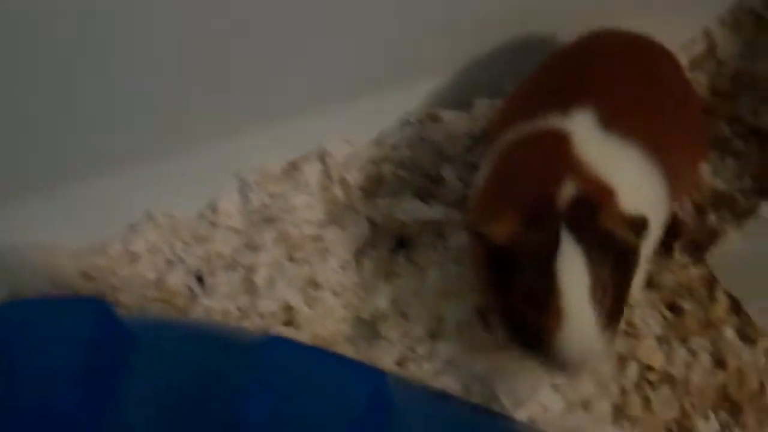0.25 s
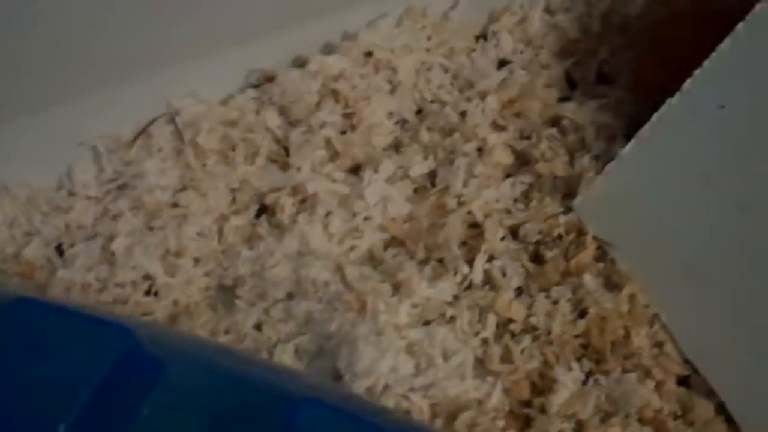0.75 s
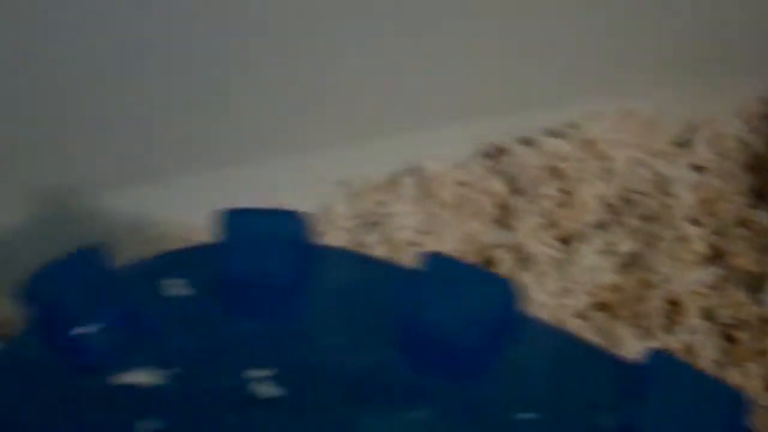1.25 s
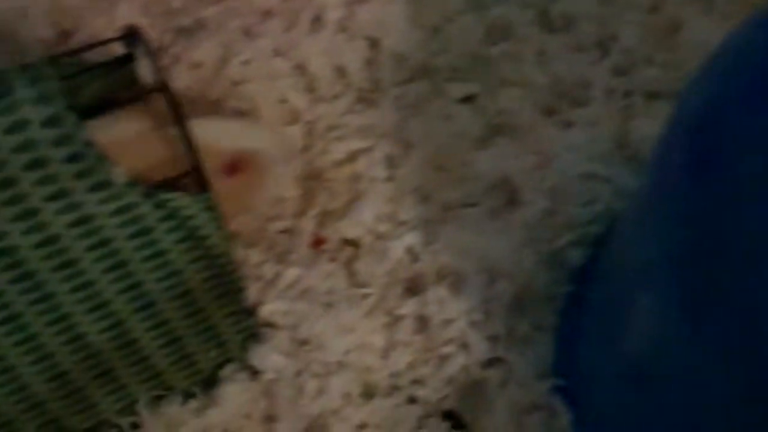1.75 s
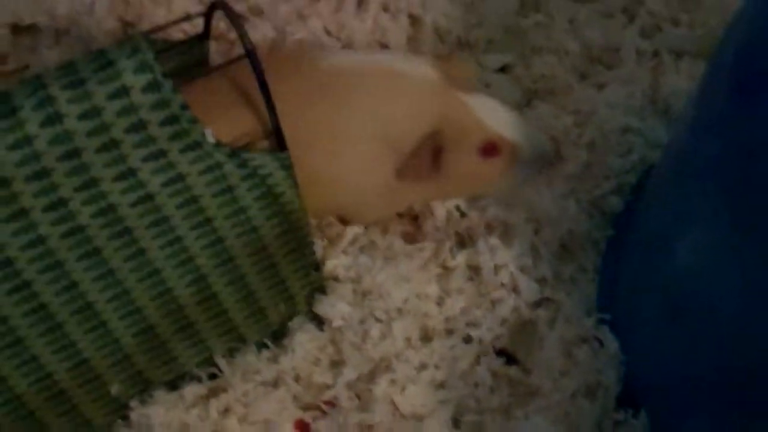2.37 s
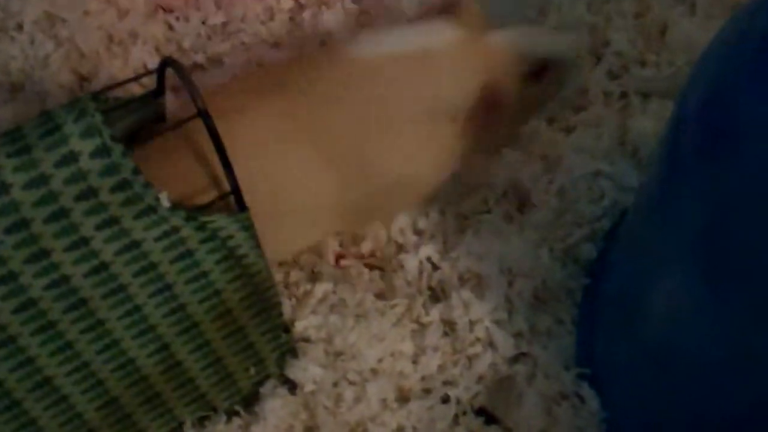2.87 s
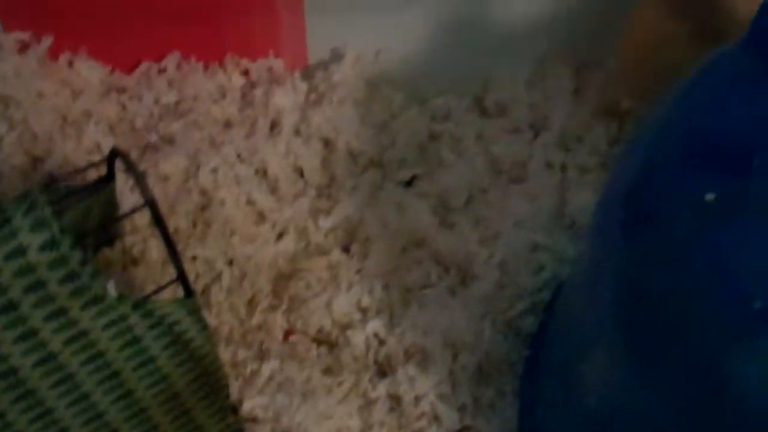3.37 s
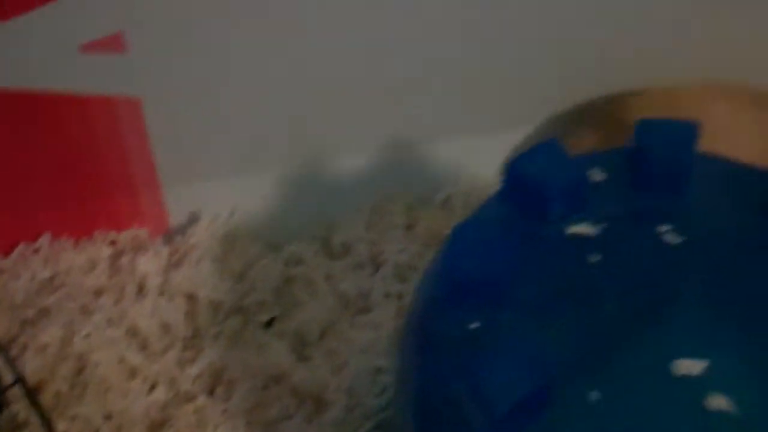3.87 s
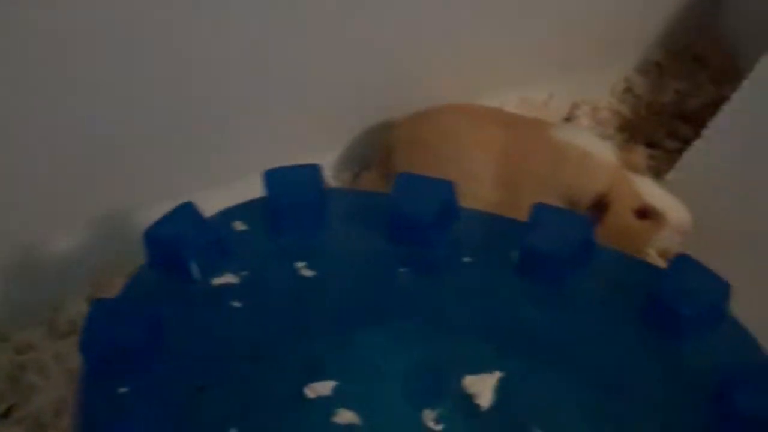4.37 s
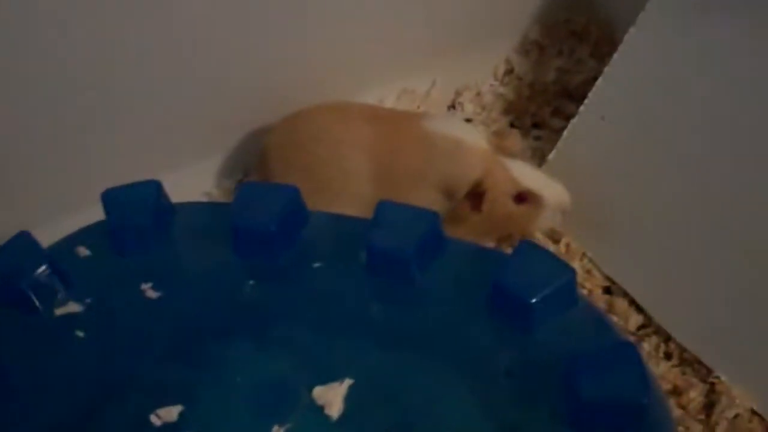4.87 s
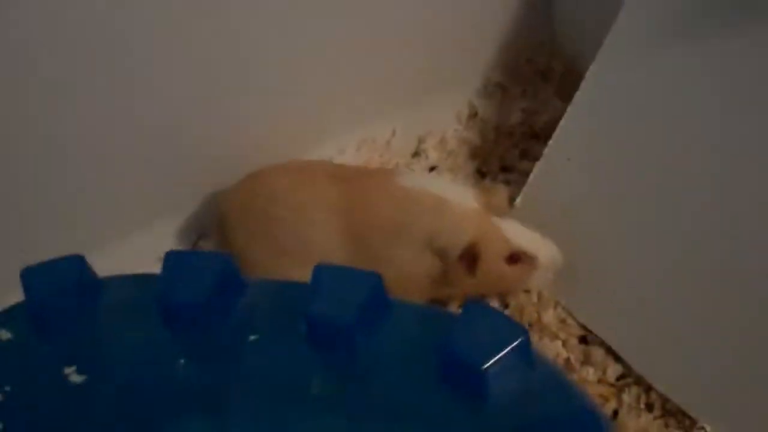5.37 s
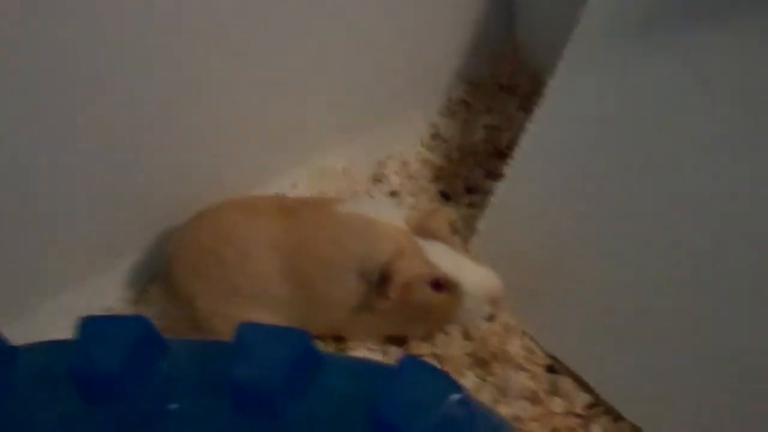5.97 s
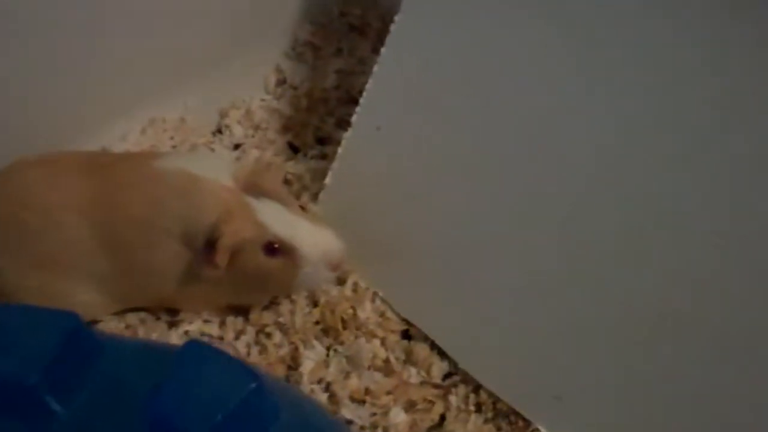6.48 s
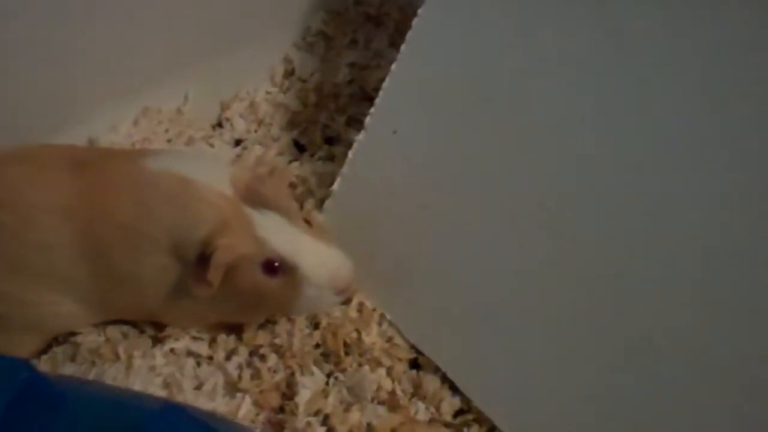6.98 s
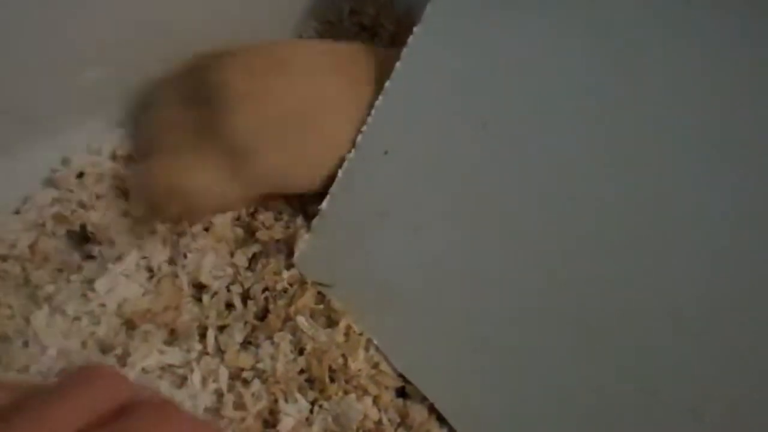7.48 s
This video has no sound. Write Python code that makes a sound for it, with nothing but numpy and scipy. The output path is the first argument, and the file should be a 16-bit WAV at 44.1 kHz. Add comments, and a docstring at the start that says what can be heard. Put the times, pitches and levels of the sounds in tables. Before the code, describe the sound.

Guinea pigs beg in a shavings-filled pen: three piercing rising wheeks early on, with constant low squeaks, hoarse chutters, rustling bedding and small knocks.

```python
"""Guinea pigs begging for food

Two guinea pigs call in a pen bedded with wood shavings, heard from close by. Three piercing wheeks sweep up
and break higher; low scooping squeaks, hoarse chutters and thin peeps go on around them. The calls are
harmonic voices, the scuffs grainy noise, the knocks short noise rings. Pen walls and a small room answer,
over hiss, a wavering hum, a thin whine and a faint low tone that swells twice."""
import sys
import numpy as np
from scipy import signal
from scipy.fft import rfft, irfft, next_fast_len
from scipy.io import wavfile
from scipy.ndimage import map_coordinates

SR = 44100
rng = np.random.default_rng(int(sys.argv[2]) if len(sys.argv) > 2 else 0)


def inscribe(sig):
    """Save sig as 16-bit PCM at rate SR to the path in sys.argv[1].

    A 1-D sig is mono; a 2-D sig holds one channel per row.
    Samples are clipped to [-1, 1] before scaling.
    """
    pcm = np.round(np.clip(np.atleast_2d(sig).T, -1, 1) * 32767)
    wavfile.write(sys.argv[1], SR, pcm.astype(np.int16))


N = 340893

# The wheeks. Each row: swell-in in seconds, length after the voice breaks in seconds, pitch aimed at by
# the end in Hz, level in dB before the mouth resonance, strain from 0 to 1.
WHEEKS = [(0.085, 0.113, 4007, -25, 0.02), (0.16, 0.078, 4050, -26.5, 0.18),
          (0.1, 0.044, 4460, -26.5, 0.46)]
# Pitch path of each wheek up to its break, one list a wheek. Each row: time in seconds, pitch in Hz.
WHEEK_GLIDES = [
    [(1.222, 3700), (1.26, 3030), (1.3, 2690), (1.365, 2696), (1.395, 2913), (1.609, 3174)],
    [(1.96, 1020), (2.05, 1812), (2.145, 1993), (2.23, 2460), (2.31, 2857), (2.402, 3071)],
    [(2.71, 1114), (2.75, 1618), (2.79, 1966), (2.82, 2084), (2.85, 2548), (2.976, 2985)],
]
# Squeaks that dip and rise. Each row: start in seconds, time from there to the dip in seconds, length in
# seconds, pitch of the dip in Hz, fundamental at the dip in dB, overtones in dB.
SQUEAKS = [(0.085, 0.058, 0.11, 514.5, -41, -43), (0.343, 0.052, 0.13, 365, -41.5, -40),
           (0.651, 0.0, 0.078, 851, -47.5, -50), (0.867, 0.031, 0.13, 579.4, -36.5, -43),
           (1.27, 0.074, 0.15, 514, -43, -55), (1.843, 0.0024, 0.12, 576.7, -29.5, -39.5),
           (2.557, 0.0038, 0.17, 633.6, -40.5, -42), (2.77, 0.045, 0.1, 630, -41, -40.0),
           (3.119, 0.028, 0.19, 586.3, -34.5, -44), (3.549, 0.031, 0.13, 549, -33, -47),
           (3.999, 0.05, 0.15, 535, -34, -45.5), (4.388, 0.049, 0.1, 517.5, -33.5, -43),
           (4.669, 0.059, 0.11, 525.6, -41, -50.5), (4.971, 0.051, 0.11, 509, -38.5, -48.0),
           (5.324, 0.03, 0.141, 562, -36.5, -46.5), (5.573, 0.062, 0.15, 587, -39.5, -49),
           (5.848, 0.05, 0.1, 482, -39.5, -50), (6.275, 0.015, 0.094, 557, -43.5, -52),
           (6.494, 0.05, 0.1, 525.4, -41, -47.5), (6.794, 0.0, 0.16, 576, -45.5, -52),
           (7.633, 0.038, 0.082, 532, -35.5, -51)]
# Faint climbs to a thin peep. Each row: time of the top in seconds, length of the climb in seconds, level in dB.
PEEPS = [(3.442, 0.11, -47), (3.891, 0.28, -46), (4.255, 0.1, -39), (4.53, 0.046, -43), (7.032, .1, -54.5)]
# Hoarse chutters, and one faint squeak at 2.358 s rendered hoarsely. Each row: centre in seconds, level in dB.
CHUTTERS = [(0.129, -44), (0.606, -41.5), (2.358, -47), (3.32, -41), (3.536, -42.5), (3.772, -42.5),
            (3.985, -42.5), (4.217, -52), (4.686, -47.5), (4.929, -43), (5.226, -38), (5.458, -44),
            (5.72, -50)]
# Scuffs in the shavings, with a short faint crackle at the very start and one breathy onset before the
# second wheek. Each row: centre in seconds, half length in seconds, swish level in dB.
SCUFFS = [(0.018, 0.013, -50.5), (0.329, 0.02, -38), (0.404, 0.044, -42), (0.57, 0.032, -41),
          (0.69, 0.18, -44), (1.02, 0.16, -46), (1.795, 0.039, -47.5), (1.881, 0.022, -39.5),
          (3.298, 0.11, -45), (5.123, 0.063, -48), (5.168, 0.0094, -44.5), (7.162, .024, -46.5),
          (7.284, 0.027, -39), (7.35, 0.023, -35), (7.425, 0.11, -43)]
# Footfalls, knocks and snapping flakes. Each row: start in seconds, level in dB before the decay and the
# soft start, centre of the ring in Hz, decay by 60 dB in seconds.
TAPS = [(0.306, -30, 845, 0.078), (0.584, -46, 120, 0.21), (.754, -24, 1290, 0.047),
        (0.758, -29.5, 6460, 0.022), (3.104, -29, 153, 0.095), (3.477, -39.5, 155, 0.18),
        (3.873, -31.5, 1700, 0.03), (4.307, -37.5, 1850, 0.025), (4.329, -38, 1737, 0.16),
        (5.176, -28.5, 4760, 0.014), (5.261, -35, 930, 0.025), (5.998, -20, 1076, 0.0084),
        (6.686, -42, 770, 0.022), (7.311, -20, 890, 0.028), (7.432, -24, 147, 0.12),
        (7.459, -29, 1390, 0.083), (7.5451, -22.5, 6330, 0.025), (7.644, -37, 1640, 0.072)]
# Low background tone. Each row: centre in seconds, half length in seconds, mean pitch in Hz, peak level in dB.
LOW_TONES = [(2.8, .22, 404, -64), (5.85, .15, 440, -69)]
# A wavering hum at 120 Hz and a faint wavering tone at 425 Hz. Each row: frequency in Hz, middle level in dB.
HUM = [(120, -72), (425, -78)]

# Overtone balance of the open mouth in a wheek. Each row: frequency in Hz, relative gain in dB.
OPEN_MOUTH = [(2000, 1), (3800, -6.5), (4800, -13.5), (5370, -1), (5750, -11), (6600, 5.5), (7300, 5),
              (8800, -1.5), (11000, -10.5), (12700, -16.5), (13450, 6), (14400, -16.5)]
# Overtone balance of the nearly shut mouth. Each row: frequency in Hz, relative gain in dB.
CLOSED_MOUTH = [(700, 4), (1200, 5), (1500, -1.5), (2200, -5), (2900, -5.5), (3400, -10.5), (4000, -19.5),
                (8000, -70)]
# Lowest mouth resonance, crossed by a wheek's fundamental. Each row: frequency in Hz, gain in dB.
WHEEK_RESONANCE = [(1800, -15.5), (2400, -9), (2700, -9), (2870, -2), (3050, 1.5), (3400, -6),
                   (4200, -10.5)]
# Body resonance under a squeak's fundamental. Each row: frequency in Hz, relative gain in dB.
CHEST = [(350, 3.5), (560, -4.5), (630, -6), (720, -11.5), (850, -9.5), (1700, -3)]
# Colour of the snapping flakes. Each row: frequency in Hz, relative gain in dB.
CRACKLE = [(800, -2.5), (2500, -3.5), (4500, -4.5), (8000, -6), (11000, -7), (14000, -1)]
# Colour of the duller bedding. Each row: frequency in Hz, relative gain in dB.
SWISH = [(60, -17), (300, -4), (800, -0.5), (1400, -9), (2800, -15.5), (4500, -21), (10000, -22)]
# Colour of the hiss. Each row: frequency in Hz, relative density in dB per Hz.
HISS = [(25, -6), (100, -3), (900, -1), (2000, -7), (4000, -10), (10500, -10), (13000, -7)]
# Room decay. Each row: frequency in Hz, decay by 60 dB in seconds.
ROOM = [(200, 0.71), (7000, 0.27), (14000, 0.4)]

# Wheek break: pitch jump as a ratio, its duration, ceiling of the burst of effort, decay of that burst
BREAK_RATIO, BREAK_S, BREAK_DB, BREAK_DECAY_S = 1.14, 0.006, 5, 0.025
# Wheek overtones against the level; dB they gain for each dB the resonance takes from the fundamental
OVERTONES_DB, OVERTONE_TRADE = 0, 0.33
WHEEK_RELEASE_S, WHEEK_FADE_DB = 0.015, 21  # dying away; depth of the swell in and out
STRAIN_HZ = 2450  # pitch at which the strain is full
ONSET_ROUGH, BREAK_ROUGH = 0.5, 0.068  # extra roughness as the voice starts and as it breaks
WHEEK_JITTER = 0.022  # share of the pitch at full roughness
TRIPLING_RAD, RASP_RAD = 0.75, 0.1  # phase swing at full roughness: regular, random

# Squeak scoop: log pitch into the dip, log pitch out of it, flatness of the dip
SCOOP_FALL, SCOOP_RISE, SCOOP_POWER = 0.45, 0.54, 2.4
SQUEAK_ATTACK_S = 0.016
SQUEAK_JITTER = 0.04  # base share of the pitch, scaled within each call
PEEP_CLIMB_DB = -7  # the climb against its top
CHUTTER_HALF_S = 0.038

# Half length at which a scuff crackles as loud as it swishes; dB of crackle lost per doubling of length
CRISP_HALF_S, CRISP_DB = 0.059, 5
STIR_DB = -58  # middle level of the faint crackle of bedding that never quite rests
TAP_OCTAVES, TAP_WIDENING = 1.33, 0.11  # ring width at 1 kHz; power of frequency by which it widens
TAP_LOW_HZ = 85  # the pen's floor radiates little below this

HISS_DB, HUM_SWING_DB = -55.5, 2.5  # hiss level; slow wavering of the hum
PEN_ECHO_DB = -8  # the walls' answer to squeaks and feet
TOP_HZ = 14300  # upper band limit


def amp(db):
    """Decibels to gain."""
    return 10 ** (np.asarray(db) / 20)


def unit(x):
    """x at rms 1."""
    return x / np.sqrt(np.mean(x ** 2) + 1e-20)


def along(points, hz):
    """Rows of Hz and value, read on a log frequency axis."""
    f, v = np.transpose(points)
    return np.interp(np.log(hz + 1), np.log(f), v)


def wobble(rate, size):
    """A smooth random curve with rate knots a second."""
    knots = rng.standard_normal(int(size * rate / SR) + 4)
    return map_coordinates(knots, [np.arange(size) * rate / SR])


def filtered(x, response):
    """x shaped by a response of frequency."""
    m = next_fast_len(N + SR // 2)
    return irfft(rfft(x, m) * response(np.fft.rfftfreq(m, 1 / SR)), m)[..., :N]


def coloured(x, points):
    """x shaped by a colour table, at rms 1."""
    return unit(filtered(x, lambda hz: amp(along(points, hz))))


def pair(three, apart_hz):
    """Two close microphones share the bass and differ more and more in the treble."""
    own = lambda hz: hz / np.hypot(hz, apart_hz)
    shared = filtered(three[0], lambda hz: np.sqrt(1 - own(hz) ** 2))
    return shared + filtered(three[1:], own)


def add(track, s, sound):
    """Mix a sound into the track from time s on."""
    part = track[max(round(s * SR), 0):][:len(sound)]
    part += sound[:len(part)]


def voice(pitch, low_db, high_db, mouth, warp, flutter_db, flutter_rate):
    """A fundamental plus overtones, which the mouth resonances balance and which each flutter alone."""
    phase = 2 * np.pi * np.cumsum(pitch) / SR + warp
    k = np.arange(2, 13)[:, None]  # harmonic numbers
    below_top = np.clip((SR * 0.36 - k * pitch) / 1000, 0, 1)  # fades out the highest overtones
    gains = amp(along(mouth, k * pitch)) * below_top
    gains /= np.linalg.norm(gains, axis=0)
    flutter = np.array([wobble(flutter_rate, len(pitch)) for _ in k])
    gains *= unit(amp(flutter_db * flutter))
    fundamental = amp(low_db) * np.sin(phase)
    overtones = amp(high_db) * np.sum(gains * np.sin(k * phase), axis=0)
    return np.sqrt(2) * (fundamental + overtones)


def wheeks(waver=0.0069):
    """Whistled glides swell in, break upward and die; strained folds jitter in cycles of three and six."""
    out = np.zeros(N)
    for glide, (attack, tail, final_hz, db, strain) in zip(WHEEK_GLIDES, WHEEKS):
        s, hz = np.transpose(glide)
        start, snap, end = s[0], s[-1], s[-1] + tail
        t = np.arange(start, end, 1 / SR)
        pitch = np.interp(t, [*s, snap + BREAK_S, end], [*hz, hz[-1] * BREAK_RATIO, final_hz])

        starting = np.clip(1 - (t - start) / attack, 0, 1)
        ending = np.clip(1 - (end - t) / WHEEK_RELEASE_S, 0, 1)
        burst = np.clip((t - snap) / BREAK_S, 0, 1) * np.exp(-np.abs(t - snap) / BREAK_DECAY_S)
        tension = np.minimum(pitch / STRAIN_HZ, 1) ** 2

        resonance_db = along(WHEEK_RESONANCE, pitch)
        low_db = db + resonance_db - WHEEK_FADE_DB * (starting * tension + ending)
        high_db = db + OVERTONES_DB - OVERTONE_TRADE * resonance_db
        high_db += BREAK_DB * burst - WHEEK_FADE_DB * (starting + ending)

        rough = np.clip((strain + ONSET_ROUGH * starting) * tension + BREAK_ROUGH * burst, 0, 1)
        jitter = WHEEK_JITTER * rough ** 2 * wobble(1100, len(t))
        pitch = pitch * (1 + waver * wobble(131.6, len(t)) + jitter)
        third = 2 * np.pi * np.cumsum(pitch) / SR / 3  # phase at a third of the pitch
        warp = TRIPLING_RAD * rough ** 2 * (np.sin(third) + 0.5 * np.sin(third / 2))
        warp += RASP_RAD * rough * wobble(3500, len(t))
        add(out, start, voice(pitch, low_db, high_db, OPEN_MOUTH, warp, flutter_db=4, flutter_rate=60.2))
    return out


def squeaks(release=0.0077):
    """Short scoops with the mouth nearly shut; body resonance shades the fundamental as it dips and rises."""
    out = np.zeros(N)
    for start, dip, length, dip_hz, low_db, high_db in SQUEAKS:
        t = np.arange(0, length, 1 / SR)
        bend = np.clip((t - dip) / (length - dip), -1, 1)  # zero at the dip
        depth = np.where(bend < 0, SCOOP_FALL, SCOOP_RISE)
        pitch = dip_hz * np.exp(depth * np.abs(bend) ** SCOOP_POWER)
        bloom_db = along(CHEST, pitch) - along(CHEST, dip_hz)
        # steadiest in the dip
        pitch = pitch * (1 + SQUEAK_JITTER * (0.5 + bend ** 2) * wobble(700, len(t)))
        swell = np.clip(t / SQUEAK_ATTACK_S, 0, 1) * np.clip((length - t) / release, 0, 1)
        call = voice(pitch, low_db + bloom_db, high_db, CLOSED_MOUTH, 0, flutter_db=2.5, flutter_rate=111.2)
        add(out, start, swell * call)
    return out


def peeps(from_hz=900, shoulder_hz=1380, top_hz=1610, arch_s=0.013, fade_db=-18, low_db=-3):
    """The voice climbs faintly to a small arch of pitch and dies away."""
    out = np.zeros(N)
    for s, climb, db in PEEPS:
        t = np.arange(-climb, arch_s, 1 / SR)  # zero at the top
        stages = [-climb, -min(arch_s, climb), 0, arch_s]
        pitch = np.interp(t, stages, [from_hz, shoulder_hz, top_hz, shoulder_hz])
        pitch = pitch * (1 + SQUEAK_JITTER * wobble(106.2, len(t)) / 2)
        level_db = db + np.interp(t, stages, [PEEP_CLIMB_DB, PEEP_CLIMB_DB, 0, fade_db])
        call = voice(pitch, level_db + low_db, level_db, CLOSED_MOUTH, 0, flutter_db=-6.5, flutter_rate=158)
        add(out, s - climb, call)
    return out


def chutters(pitch_hz=560, drift=0.12, jitter=0.11, low_db=-8, rattle_db=4.0):
    """The same throat with the folds flapping irregularly, the pitch wandering."""
    t = np.arange(N) / SR
    # flat-topped swells
    swell = sum(amp(db) * np.exp(-0.5 * ((t - s) / CHUTTER_HALF_S) ** 6) for s, db in CHUTTERS)
    pitch = pitch_hz * np.exp(drift * wobble(25, N) + jitter * wobble(600, N))
    throat = voice(pitch, low_db, 0, CLOSED_MOUTH, 0, flutter_db=-1, flutter_rate=96)
    return swell * unit(throat * amp(rattle_db * wobble(200, N)))


def shavings(grain_db=5, clump_db=1.5, stir_swing_db=4):
    """Swells of tiny snaps over a duller swish, the quicker the crisper; the breathy onset is made alike."""
    t = np.arange(N) / SR
    crackle_power = amp(STIR_DB + stir_swing_db * wobble(3, N)) ** 2
    swish_power = np.zeros(N)
    for s, half, db in SCUFFS:
        swell = amp(db) * np.exp(-0.5 * ((t - s) / half) ** 2)
        crispness = amp(-CRISP_DB * np.log2(half / CRISP_HALF_S))
        crackle_power += (crispness * swell) ** 2
        swish_power += swell ** 2
    clumps = amp(clump_db * wobble(150, N))

    def flakes():
        """Noise broken into grains, with both layers sharing the same clumps."""
        grains = rng.standard_normal((3, N)) * clumps * amp(grain_db * wobble(2500, N))
        return pair(grains, apart_hz=8400)

    crackle = np.sqrt(crackle_power) * coloured(flakes(), CRACKLE)
    swish = np.sqrt(swish_power) * coloured(flakes(), SWISH)
    return crackle + swish


def taps():
    """Each contact rings briefly in one band: low on the floor, middle on plastic, high for a snapping flake."""
    out, t = np.zeros(N), np.arange(SR // 4) / SR
    hz = np.fft.rfftfreq(len(t), 1 / SR)
    for s, db, centre_hz, t60 in TAPS:
        octaves = TAP_OCTAVES * (centre_hz / 1000) ** TAP_WIDENING
        band = 1 / (1 + (2 * np.log2((hz + 1) / centre_hz) / octaves) ** 2)
        ring = unit(irfft(rfft(rng.standard_normal(len(t))) * band, len(t)))
        soft_start = 1 - np.exp(-2 * t * centre_hz)
        add(out, s, ring * amp(db - 60 * t / t60) * soft_start)
    return signal.sosfilt(signal.butter(2, TAP_LOW_HZ, 'high', fs=SR, output='sos'), out)


def walls(x, t60=0.12, echo_db=-4):
    """Dense early echoes off the pen, unlike in each treble channel, make gliding tones fade in and out."""
    t = np.arange(SR // 10) / SR
    echoes = rng.standard_normal((3, len(t))) * amp(-60 * t / t60) * (t > 0.001)
    echoes *= amp(echo_db) / np.linalg.norm(echoes, axis=1, keepdims=True)
    answer = signal.fftconvolve(x.mean(0)[None], echoes, axes=1)[:, :N]
    return x + pair(answer, apart_hz=1110)


def room(x):
    """A diffuse tail in which each frequency dies at its own speed."""
    hz, t, z = signal.stft(rng.standard_normal((3, SR // 2)), SR, nperseg=256)
    decay = amp(-60 * t / along(ROOM, hz)[:, None])
    tail = signal.istft(z * decay, SR, nperseg=256)[1]
    tail = tail / np.linalg.norm(tail[0])
    late = np.pad(x, (200, 0))[None]  # delay in samples
    wet = signal.fftconvolve(late, tail, axes=1)[:, :N]
    return pair(wet, apart_hz=3240)


def from_right(x, lag_s):
    """A sound from the right reaches the left microphone a little later."""
    return filtered(x, lambda hz: np.exp(-2j * np.pi * hz * np.array([[lag_s], [0]])))


def low_tone(waver=0.0109):
    """A faint, unsteady sine comes and goes in smooth swells."""
    t = np.arange(N) / SR
    phase = 2 * np.pi * np.cumsum(1 + waver * wobble(5.6, N)) / SR  # for 1 Hz
    out = np.zeros(N)
    for s, half, hz, db in LOW_TONES:
        swell = amp(db) * np.exp(-0.5 * ((t - s) / half) ** 2)
        out += np.sqrt(2) * swell * np.sin(hz * phase)
    return out


def background(whine_db=-68, whine_hz=7880, whine_width_hz=90):
    """Room air and microphone hiss as shaped noise, wavering low sines and a narrow-band electronic whine."""
    hiss = coloured(pair(rng.standard_normal((3, N)), apart_hz=2500), HISS)
    whine_band = lambda hz: 1 / (1 + ((hz - whine_hz) / whine_width_hz) ** 2)
    whine = unit(filtered(rng.standard_normal((2, N)), whine_band))
    t = np.arange(N) / SR
    hum = np.zeros(N)
    for hz, db in HUM:
        level = np.sqrt(2) * amp(db + HUM_SWING_DB * wobble(2.89, N))
        hum += level * np.sin(2 * np.pi * hz * t + 0.5 * wobble(1.6, N))
    return amp(HISS_DB) * hiss + amp(whine_db) * whine + hum


def scene(wheek_left_db=-2.6, wheek_right_db=2.5, wheek_lag_s=0.00008, squeak_lag_s=0.00007,
          wheek_room_db=-11, near_room_db=-15):
    """The wheeker sits well to the right, the squeaks slightly right, the rustle and knocks in front."""
    loud = wheeks()
    calls = squeaks() + peeps() + chutters()
    feet = taps() + shavings()
    sides = amp([[wheek_left_db], [wheek_right_db]])
    wheek = from_right(walls(loud[None], echo_db=-2), wheek_lag_s) * sides
    near = from_right(walls(calls[None], echo_db=PEN_ECHO_DB), squeak_lag_s)
    near = near + walls(feet, echo_db=PEN_ECHO_DB)
    tail = room(amp(wheek_room_db) * loud + amp(near_room_db) * (calls + feet[0]))
    return wheek + near + tail + low_tone() + background()


def record(dry):
    """A steep low-pass keeps nothing above the band limit."""
    return filtered(dry, lambda hz: np.clip((TOP_HZ - hz) / 200 + 0.5, 0, 1))


dry = scene()
out = record(dry)
inscribe(out)
```